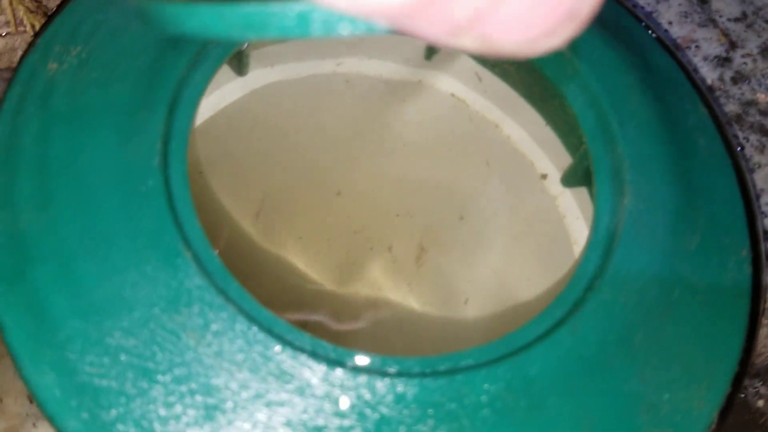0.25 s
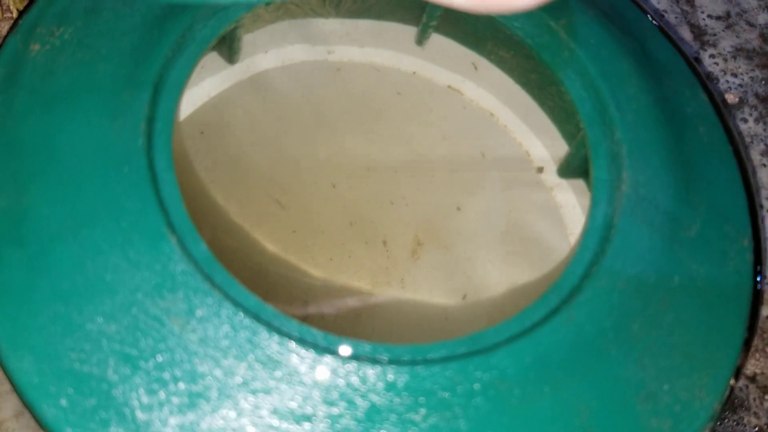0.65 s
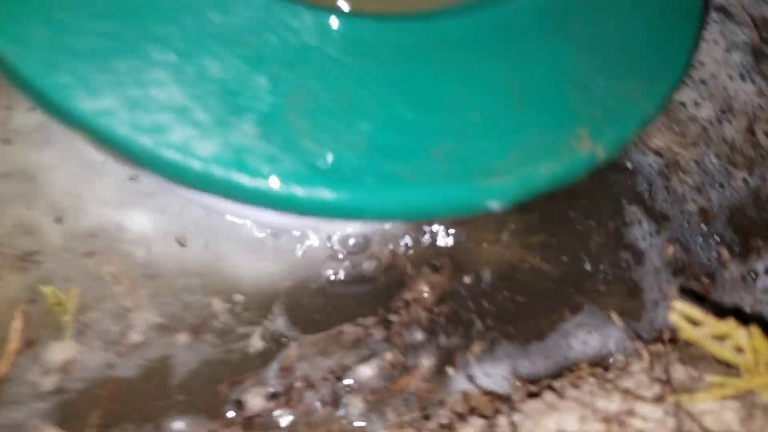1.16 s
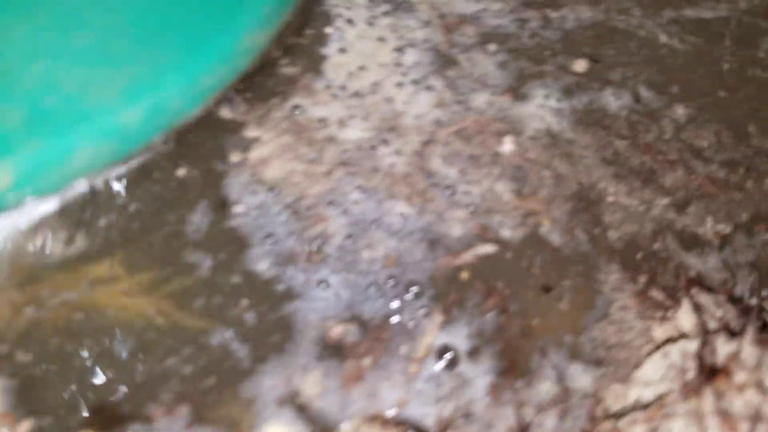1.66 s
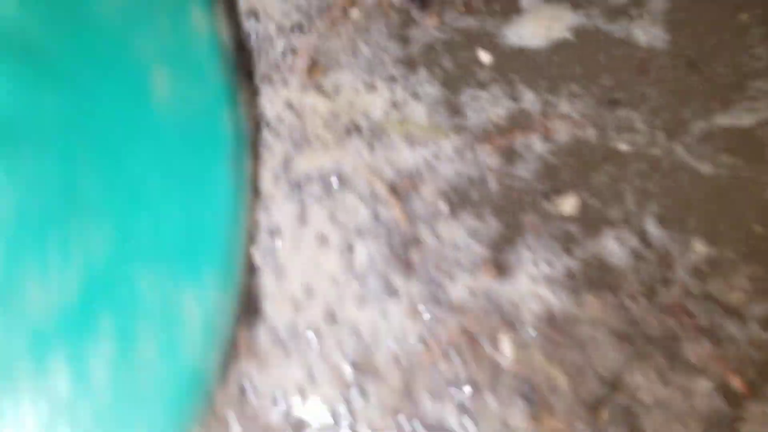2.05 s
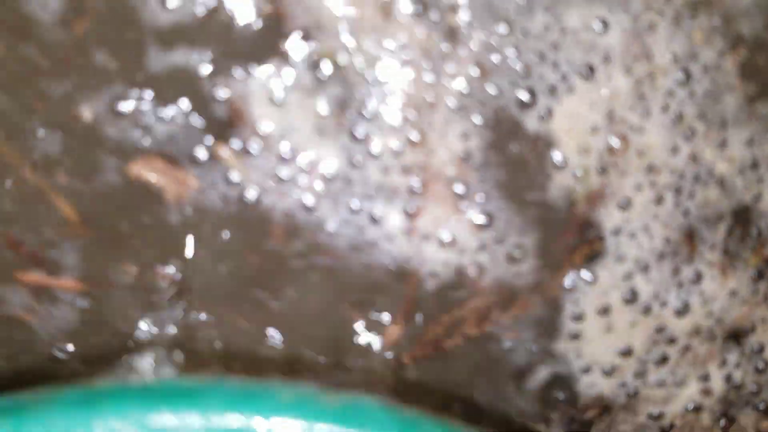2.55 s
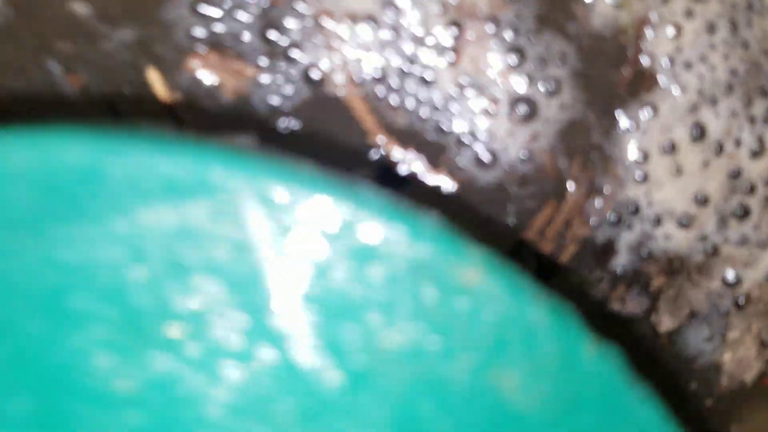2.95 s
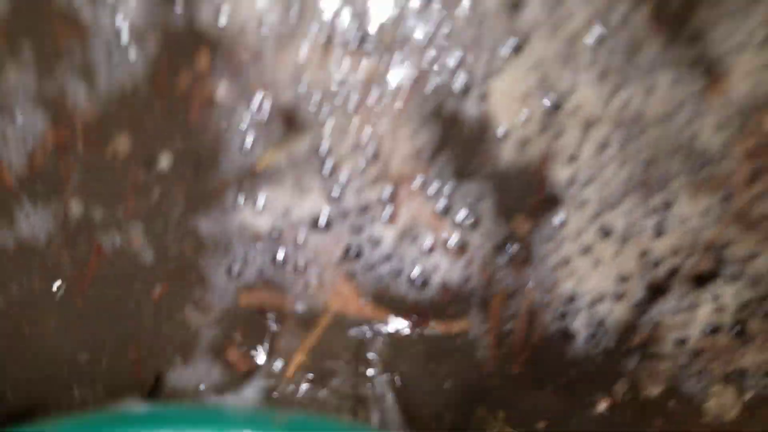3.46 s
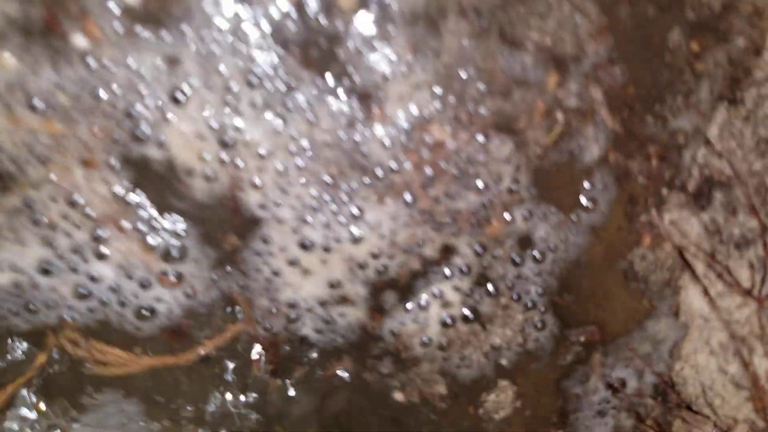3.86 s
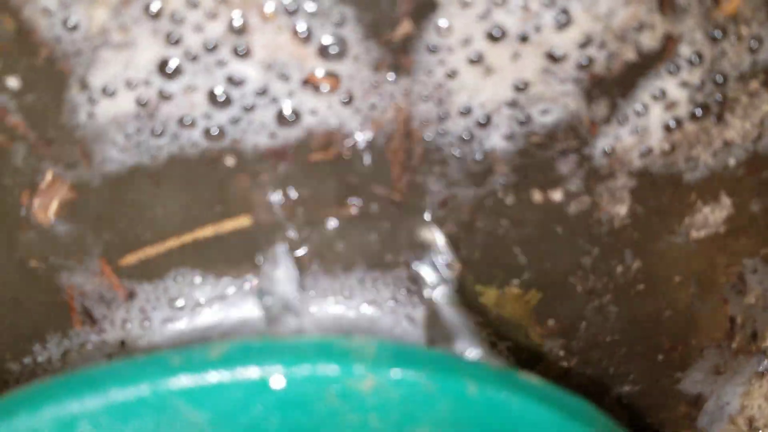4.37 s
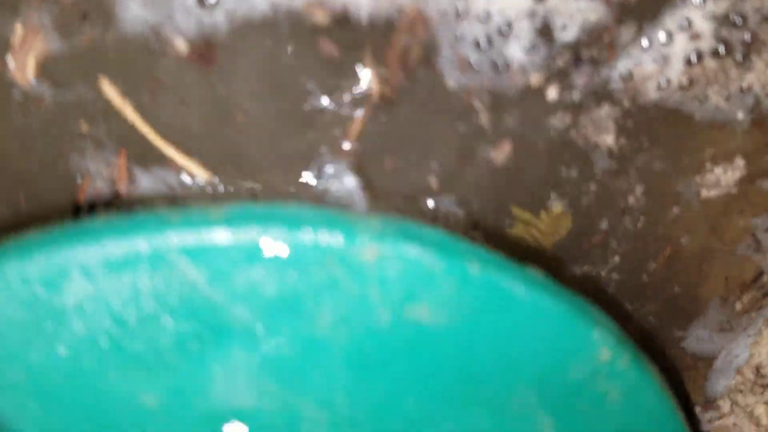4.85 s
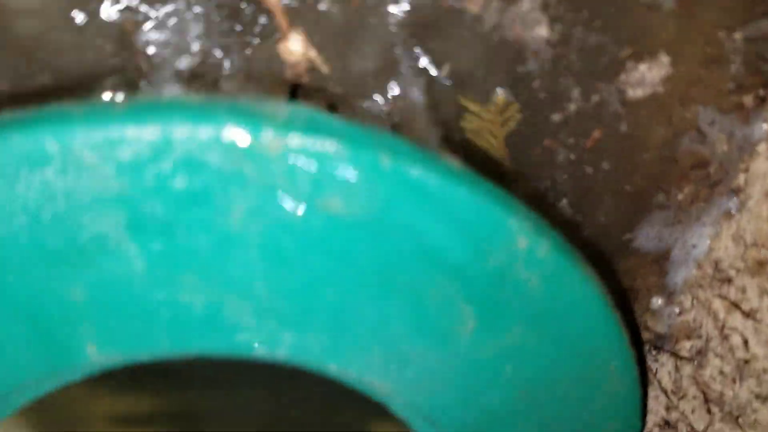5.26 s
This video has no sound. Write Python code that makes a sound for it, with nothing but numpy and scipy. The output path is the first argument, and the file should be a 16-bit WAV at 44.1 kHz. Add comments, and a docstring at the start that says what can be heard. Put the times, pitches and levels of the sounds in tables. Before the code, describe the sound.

Rainwater wells into a foamy puddle, heard from very near. Bright ticks and tiny rising plips ride on patchy hiss; hollow glugs lead to a busy crackling burst around two seconds, then it thins, with soft rim knocks and a last gulp near four. A strong double pop comes just after five. Faint cricket and air rumble; unequal left and right channels.

```python
"""Buried plastic drain outlet: rainwater wells into a foamy puddle, heard by a hand-held phone close above.
Bubbles are damped rising sines with noise snaps; fizz is patchy noise plus swarms of tiny rings.
Air pockets gulp at the pipe mouth, the rim knocks, an air gap resonates, a cricket trills, air stirs the ports.
The two microphones are unlike: left open and bright, right muffled with one broad peak."""
import sys
import numpy as np
from scipy import signal
from scipy.fft import rfft, irfft, next_fast_len
from scipy.io import wavfile
from scipy.ndimage import uniform_filter1d, map_coordinates

SR = 44100
rng = np.random.default_rng(int(sys.argv[2]) if len(sys.argv) > 2 else 0)


def volts(x):
    """Linear amplitude factor 10**(x/20) for a level x in dB, scalar or array-like."""
    e = np.asarray(x, float) / 20
    return 10 ** e


def transcribe(signal):
    """Save signal, clipped to [-1, 1], as a 16-bit WAV file at the path in sys.argv[1]."""
    frames = np.atleast_2d(signal).T
    limited = np.clip(frames, -1, 1)
    pcm = np.round(limited * 32767).astype(np.int16)
    wavfile.write(sys.argv[1], SR, pcm)


N = 242991

# Source levels are nominal, ahead of filters and microphone colour.
# loudest bursting bubbles: start_s, start_pitch_hz, ring_level_db, snap_ref_db
BUBBLES = [(0.117, 3000, -37, -45), (0.177, 1960, -29, -43), (0.393, 5040, -26.5, -49),
           (0.4528, 5360, -28, -29), (0.521, 4060, -31.5, -42), (0.5753, 1800, -19.5, -22),
           (0.64, 1950, -21, -52), (0.7304, 3460, -38, -22), (0.7498, 4130, -32.5, -18),
           (0.9178, 2600, -32, -18), (0.9508, 4960, -27, -31), (0.9691, 4150, -16.5, -10.5),
           (1.0156, 3340, -28.5, -24), (1.1173, 4830, -57, -19), (1.1276, 4100, -52, -25),
           (1.2236, 3730, -33, -38), (1.2484, 5370, -24.5, -11), (1.3093, 3800, -29, -39),
           (1.3985, 5020, -28, -47), (1.418, 2100, -28.5, -50), (1.4544, 4400, -31, -20.5),
           (1.563, 1880, -27.5, -22), (1.849, 2060, -27, -46), (1.8797, 4500, -19.5, -11.5),
           (1.957, 2750, -28, -28), (1.966, 3400, -36, -13), (1.987, 2850, -32.5, -18),
           (2.1123, 2500, -23, -16), (2.1432, 2700, -32, -25), (2.1583, 3720, -25.5, -22),
           (2.1865, 3360, -26, -17), (2.2044, 4880, -15, -11), (2.2106, 4600, -20.5, -12),
           (2.237, 1590, -30, -15), (2.2587, 4500, -21, -16.5), (2.282, 3730, -24.5, -14),
           (2.3166, 4430, -19.5, -31), (2.3259, 4480, -21, -18), (2.3476, 4780, -24, -17),
           (2.351, 4060, -25, -12), (2.381, 4560, -29, -31), (2.392, 3920, -31, -32),
           (2.412, 2160, -28, -49), (2.445, 4120, -24.5, -18.5), (2.539, 5300, -30, -25),
           (2.5883, 2580, -34, -17), (2.606, 2450, -23, -24), (2.6519, 5370, -19, -7),
           (2.749, 4570, -19.5, -21), (2.7639, 3870, -20.5, -38.5), (2.8215, 3670, -22, -50),
           (2.8584, 3260, -34, -20), (2.879, 3450, -31, -16.5), (3.043, 1870, -30, -29),
           (3.0968, 2800, -21.5, -48), (3.1049, 2950, -23, -46), (3.214, 2670, -19.5, -24),
           (3.231, 4500, -19.5, -38), (3.2429, 3940, -12, -25), (3.34, 4400, -30, -50),
           (3.4153, 4200, -51, -19.5), (3.45, 4070, -53, -22.5), (3.8136, 1920, -45, -24),
           (3.8548, 1785, -19, -16.5), (3.8842, 1520, -28, -30), (3.905, 5300, -24, -25),
           (3.933, 5460, -28, -25.5), (4.0085, 2060, -32.5, -12), (4.06, 2200, -35.5, -24.5),
           (4.1455, 1875, -29.5, -15.5), (4.2211, 4140, -17, -28), (4.335, 5200, -31.5, -23.5),
           (4.378, 4480, -34.5, -45), (4.44, 1990, -32.5, -53), (4.495, 5000, -32, -49),
           (4.574, 4450, -31, -43), (4.776, 5500, -33, -45), (5.0442, 2210, -32.5, -24),
           (5.0508, 4300, -29.5, -17.5), (5.057, 5940, -27, -25), (5.096, 2014, -14, -5.5),
           (5.1033, 3090, -17, -9.5), (5.144, 4830, -33, -28), (5.1507, 1330, -29.5, -20.5),
           (5.179, 3820, -31, -21.5), (5.217, 5540, -29, -18), (5.2844, 2740, -21, -22.5),
           (5.34, 3430, -27, -15.5), (5.4131, 3670, -27, -23)]
# air pockets at the pipe mouth: start_s, level_db, pitch_hz
AIR_GULPS = [(0.755, -16, 1000), (0.948, -15.5, 1070), (1.465, -11.5, 1230), (1.981, -24, 716),
             (2.007, -17.5, 687), (2.2, -26, 670), (2.261, -22.5, 657), (4.009, -13, 1300)]
# liveliness of the outflow: time_s, fizz_level_db
OUTFLOW = [(0, -43.5), (0.35, -42), (0.87, -45.5), (1.1, -43), (1.45, -44), (1.75, -46), (2.0, -44),
           (2.33, -42.5), (2.5, -45), (3.1, -47.5), (3.75, -48), (4.45, -45.5), (4.85, -50), (5.1, -47),
           (5.51, -45)]
# note of the air between phone and pipe mouth: time_s, pitch_hz, rms_level_db
AIR_GAP = [(0, 590, -59), (1.6, 645, -63), (2.12, 695, -51.5), (2.25, 697, -38.5), (2.36, 863, -49.5),
           (2.62, 1000, -52.5), (2.75, 1050, -87)]
# cricket trills: start_s, end_s, level_before_strokes_db
CRICKET_TRILLS = [(0.13, 0.43, -59.5), (0.62, 0.79, -64), (2.59, 2.832, -59), (3.369, 3.528, -61.5)]
# microphone responses: freq_hz, left_gain_db, right_gain_db
MIC_RESPONSE = [(393, -9.5, -26), (1000, -13.5, -31), (1643, -6.5, -25), (1800, -1.5, -18),
                (2520, -1.5, -19), (2810, -1.5, -7.5), (3840, 3, -2), (5370, 0, 1), (6655, -4.5, -6),
                (8280, -14, -76), (9960, -2, -38), (13500, -1, -38), (16000, -11, -23)]
# spectrum of air at the ports: freq_hz, left_relative_db, right_relative_db
STIR_SPECTRUM = [(18, -2.5, -10.5), (58, -4, 2.5), (124, -7.5, -3.5), (208, -10, -13.5), (377, -16, -29),
                 (896, -29.5, -39), (1780, -74, -51)]
# air puffs on the muffled port: start_s, level_db
PORT_PUFFS = [(1.751, -35), (2.25, -33.5), (3.082, -38.5), (3.943, -31.5), (4.537, -30.5)]
# dull knocks on the plastic rim: start_s, level_db
RIM_KNOCKS = [(2.585, -23.5), (2.902, -16), (2.9183, -21), (3.159, -28.5), (4.221, -16)]
# water running inside the pipe, louder while the phone faces its mouth: time_s, level_db
PIPE_WASH = [(0, -37), (1.15, -44), (1.45, -33), (2.0, -39), (2.28, -33.5), (2.55, -50.5), (5.51, -49.5)]
# air moving past the phone: time_s, level_db
BREEZE_LEVEL = [(0, -57), (0.85, -58), (1.1, -53), (1.7, -57.5), (2.28, -48.5), (2.7, -52.5), (4.4, -52),
                (4.85, -55), (5.51, -51.5)]

BAND_TOP_HZ, CRICKET_HZ = 15780, 4220
POP_PAN_CENTRE_DB, POP_PAN_RANGE_DB = -1.5, 7  # positive pan = left
GULP_T60_AT_1KHZ_S, GULP_T60_POWER = 0.011, 3  # T60 grows as (1 kHz / pitch) ** power
SPRAY_MEAN_DB, SPRAY_DB_PER_FLOW_DB = -51, 0.1


def pops():
    """Loud bubbles: rising ring, rival mode and splash; the torn film gives a sharp tick and a longer snap."""
    start_s, hz, ring_db, snap_db = np.transpose(BUBBLES)
    chance = rng.random((len(start_s), 3))
    pan_db = POP_PAN_CENTRE_DB + POP_PAN_RANGE_DB * (chance[:, 2] - 0.5)
    t60_s = (34 + 22 * chance[:, 0]) / hz
    ring = rings(hz, ring_db, t60_s, rise=0.077, attack_s=0.0001, size=1300)
    rival_hz = hz * (0.67 + 0.56 * chance[:, 1])
    rival = rings(rival_hz, ring_db - 6, 0.55 * t60_s, rise=0.15, attack_s=0.0002, size=1300)
    splash = snaps(ring_db - 5, 0.15 * t60_s, size=1300)
    tear = snaps(snap_db - 11.0, [0.009], size=600)
    tick = snaps(snap_db + 3.5, [0.0018], size=600)
    body = placed(ring + rival + splash, start_s, pan_db)
    film = placed(tear + tick, start_s, pan_db)
    body = coloured(body, lambda f: high_pass_db(f, edge_hz=1700, slope_db=2.5))
    film = coloured(film, lambda f: high_pass_db(f, edge_hz=9020, slope_db=15.0))
    return body + film


def fizz():
    """Foam, spray and pipe wash share one fast random surge; grains come thicker in lively flow."""
    flow_db, = curves(OUTFLOW)
    lively = volts(3.2 * flow_db + 2.5 * wobble(60))
    surge = volts(1.4 * wobble(45))
    return surge * (foam(flow_db, lively) + spray(flow_db, lively) + pipe_wash())


def foam(flow_db, lively):
    """Countless far bursts merge to mid-band hiss, with nearer grains on top."""
    grains = crowd(lively, count=2600, centre_hz=3905, spread=0.708, cycles=88, scatter_db=9.5, size=600)
    body = patchy_hiss() + volts(-7.5) * grains
    return volts(flow_db) * coloured(body, lambda f: high_pass_db(f, edge_hz=1160, slope_db=48.0)
                                   + low_pass_db(f, edge_hz=4760, slope_db=13.0))


def spray(flow_db, lively):
    """The finest bursts: treble hiss and very short grains, weakly following the flow."""
    level_db = SPRAY_MEAN_DB + SPRAY_DB_PER_FLOW_DB * (flow_db - flow_db.mean())
    grains = crowd(lively, count=4000, centre_hz=12170, spread=0.45, cycles=18, scatter_db=7.0, size=200)
    bright = patchy_hiss() + volts(-0.5) * grains
    return volts(level_db) * coloured(bright, lambda f: high_pass_db(f, edge_hz=9400, slope_db=11))


def pipe_wash():
    """Water running inside the pipe: low-passed patchy hiss."""
    level_db, = curves(PIPE_WASH)
    return volts(level_db) * coloured(patchy_hiss(), lambda f: low_pass_db(f, edge_hz=1450, slope_db=31.0))


def patchy_hiss():
    """Two channels of noise with random patches of level over time and frequency; rms 1."""
    z = signal.stft(rng.standard_normal((2, N)), nperseg=256)[2]
    field = uniform_filter1d(rng.standard_normal(z.shape), size=5, axis=1)
    field = uniform_filter1d(field, size=7, axis=2)
    patches = volts(4.5 * field / field.std())
    return unit(signal.istft(z * patches, nperseg=256)[1][:, :N])


def crowd(lively, count, centre_hz, spread, cycles, scatter_db, size):
    """Small drops, denser in lively flow, a few louder than the rest: most tick, some ring; rms 1."""
    chance = rng.random((count, 5))
    start_s = np.interp(chance[:, 0], np.cumsum(lively) / lively.sum(), np.arange(N) / SR)
    hz = centre_hz * np.exp(spread * (2 * chance[:, 1] - 1))
    level_db = -scatter_db * np.log(1 - 0.93 * chance[:, 2])
    t60_s = cycles * (0.12 + chance[:, 3] ** 2) / hz
    shapes = rings(hz, level_db, t60_s, rise=0.17, attack_s=0.000037, size=size)
    shapes = shapes / np.sqrt(np.c_[t60_s * hz])  # longer rings start softer
    return unit(placed(shapes, start_s, 14 * (chance[:, 4] - 0.5)))


def gulps():
    """Larger air pockets at the pipe mouth ring lower and longer, each with a noise burst."""
    start_s, level_db, hz = np.transpose(AIR_GULPS)
    t60_s = GULP_T60_AT_1KHZ_S * (1000 / hz) ** GULP_T60_POWER
    ring = rings(hz, level_db, t60_s, rise=0.046, attack_s=0.00083, size=3500)
    burst = snaps(level_db - 5.5, 0.28 * t60_s, size=3500)
    air = placed(ring + burst, start_s, 0 * start_s)
    return coloured(air, lambda f: low_pass_db(f, edge_hz=2300, slope_db=9.5))


def knocks():
    """Plastic rim: one dull, heavily damped push and a dry noise crack."""
    start_s, level_db = np.transpose(RIM_KNOCKS)
    push = rings([230], level_db, [0.009], rise=1.0, attack_s=0.000081, size=900)
    crack = snaps(level_db + 2.5, [0.016], size=900)
    rim = placed(push + crack, start_s, 0 * start_s)
    return coloured(rim, lambda f: low_pass_db(f, edge_hz=2300, slope_db=9.5))


def hollow(near):
    """Air gap as a moving one-pole resonator, driven by noise that swells with each near burst."""
    hz, level_db = curves(AIR_GAP)
    phase = 2 * np.pi * np.cumsum(hz * (1 + 0.0074 * wobble(26.4))) / SR
    keep = np.exp(-np.pi * 60 / SR)  # 60 Hz bandwidth
    splash = uniform_filter1d(abs(near[0]), size=100)
    drive = rng.standard_normal(N) * (1 + volts(35.5) * splash)
    baseband = signal.lfilter([1], [1, -keep], drive * np.exp(-1j * phase))
    return volts(level_db) * unit((baseband * np.exp(1j * phase)).real)


def cricket():
    """Husky note, tone plus narrow noise, pulsed by wing strokes; right channel 6 dB down."""
    t, out = np.arange(N) / SR, np.zeros(N)
    phase = 2 * np.pi * CRICKET_HZ * t
    for start_s, end_s, level_db in CRICKET_TRILLS:
        swell = np.clip(np.minimum(t - start_s, end_s - t) / 0.045, 0, 1)
        strokes = 2.8 + np.sin(np.pi * 45.3 * (t - start_s)) ** 2  # 45.3 strokes/s
        note = 0.3 * np.sin(phase) + 0.75 * narrow(phase, width_hz=240)
        out += volts(level_db) * swell * strokes * note
    return out * volts([[0], [-6]])


def stir():
    """Moving air buffets each port in lumps, only partly alike."""
    noise = rng.standard_normal((3, N))
    lumps = volts(np.array([1.5 * wobble(10), 3.5 * wobble(15)]))
    rumble = coloured(noise[:2] + 0.45 * noise[2], lambda f: along(STIR_SPECTRUM, f))
    return volts(curves(BREEZE_LEVEL)[0]) * lumps * rumble / np.std(rumble)


def puffs():
    """Air pushes the muffled right port through a few slow, damped cycles."""
    start_s, level_db = np.transpose(PORT_PUFFS)
    push = rings([58], level_db, [0.14], rise=0.028, attack_s=0.0085, size=6000)
    return placed(push, start_s, 0 * start_s - 14)


def puddle(x):
    """Ground, lid and phone body scatter each burst into a short decaying-noise smear."""
    tail = unit(snaps(np.zeros(2), [0.03], size=2000)) / np.sqrt(2000)
    return signal.fftconvolve(x, tail, axes=1)[:, :N]


def rings(hz, db, t60, rise, attack_s, size):
    """Damped sines whose pitch climbs over t60 as the bubble nears the surface."""
    t = np.arange(size) / SR
    hz, db, t60 = np.c_[hz], np.c_[db], np.c_[t60]
    phase = 2 * np.pi * hz * t * (1 + rise * np.minimum(t / t60, 1))
    return volts(db - 60 * t / t60) * np.sin(phase) * (1 - np.exp(-t / attack_s))


def snaps(db, t60, size):
    """Short decaying noise bursts, as of tearing water film."""
    fade = volts(-60 * np.arange(size) / SR / np.c_[t60])
    burst = unit(fade * rng.standard_normal((len(db), size)))
    fade_rms = np.linalg.norm(fade, axis=1, keepdims=True) / np.sqrt(size)
    return volts(np.c_[db]) * burst * fade_rms


def placed(shapes, start_s, pan_db):
    """Sum rows into two channels; the far side is softer, and the right lags more for left sources."""
    lag_s = np.clip(0.00016 + 0.00006 * pan_db, -0.0004, 0.0006)
    starts_s = [start_s, np.clip(start_s + lag_s, 0, None)]
    gains = [volts(np.minimum(pan_db, 0)), volts(np.minimum(-pan_db, 0))]
    out = []
    for side_s, gain in zip(starts_s, gains):
        first = np.round(side_s * SR).astype(int)
        index = first[:, None] + np.arange(shapes.shape[1])
        out.append(np.bincount(index.ravel(), (gain[:, None] * shapes).ravel(), N + SR)[:N])
    return np.array(out)


def narrow(phase, width_hz):
    """A band of noise riding on a phase track."""
    return wobble(width_hz) * np.cos(phase) + wobble(width_hz) * np.sin(phase)


def wobble(rate_hz):
    """Smooth random curve, rate_hz knots a second."""
    knots = rng.standard_normal(int(N * rate_hz / SR) + 4)
    return map_coordinates(knots, [np.arange(N) * rate_hz / SR])


def coloured(x, level_db):
    """Causal minimum-phase filter with the given dB response of frequency."""
    m = 2 * next_fast_len(N // 2 + 4096)
    cepstrum = irfft(np.log(volts(level_db(np.fft.rfftfreq(m, 1 / SR)))), m)
    cepstrum = 2 * cepstrum * (np.arange(m) < m // 2) - cepstrum * (np.arange(m) == 0)
    return irfft(rfft(x, m) * np.exp(rfft(cepstrum, m)), m)[..., :N]


def high_pass_db(hz, edge_hz, slope_db):
    """Falls by slope_db an octave below the edge."""
    return slope_db * np.minimum(0, np.log2((hz + 20) / edge_hz))


def low_pass_db(hz, edge_hz, slope_db):
    """Falls by slope_db an octave above the edge."""
    return slope_db * np.minimum(0, np.log2(edge_hz / (hz + 20)))


def along(points, hz):
    """Each column after the frequency, interpolated on a log axis."""
    f, *cols = np.transpose(points)
    return np.array([np.interp(np.log(hz + 1), np.log(f + 1), c) for c in cols])


def curves(rows):
    """One value per sample for each column after the time."""
    time_s, *cols = np.transpose(rows)
    return [np.interp(np.arange(N) / SR, time_s, c) for c in cols]


def unit(x):
    """Each channel to rms 1."""
    return x / np.sqrt(np.mean(x ** 2, axis=-1, keepdims=True) + 1e-20)


def scene():
    """Water and cricket through the two microphones, plus the air at their ports."""
    near = pops() + gulps() + knocks()
    heard = near + volts(-9) * puddle(near) + fizz() + hollow(near) + cricket()
    return coloured(heard, lambda f: along(MIC_RESPONSE, f)) + stir() + puffs()


def roll_off(x):
    """The treble ends steeply here."""
    return signal.sosfilt(signal.butter(12, 16980, fs=SR, output="sos"), x)


def record(dry):
    """Faint hiss of the phone's electronics, then a steep 30 dB drop at the band top."""
    heard = dry + volts(-77.0) * rng.standard_normal(dry.shape)
    heard = coloured(heard, lambda f: -30 * (f > BAND_TOP_HZ))
    return roll_off(heard)


dry = scene()
out = record(dry)
transcribe(out)
```